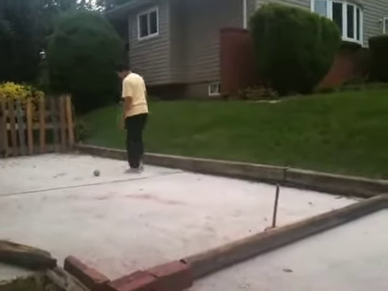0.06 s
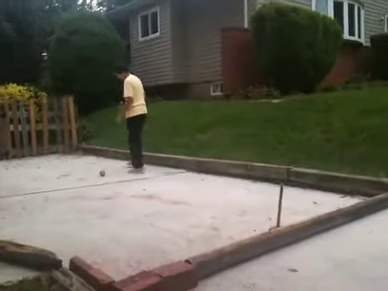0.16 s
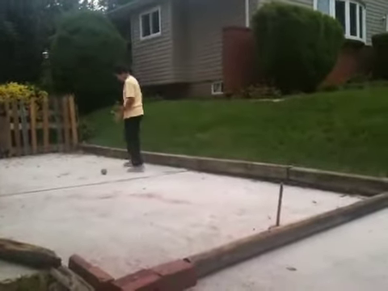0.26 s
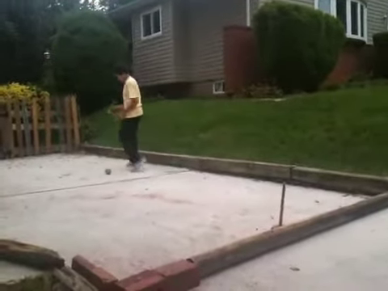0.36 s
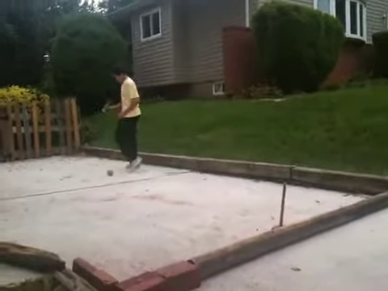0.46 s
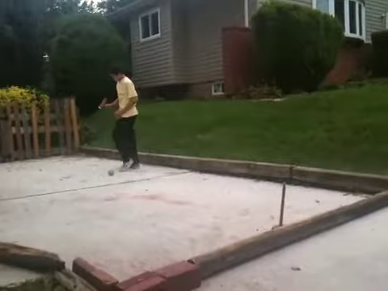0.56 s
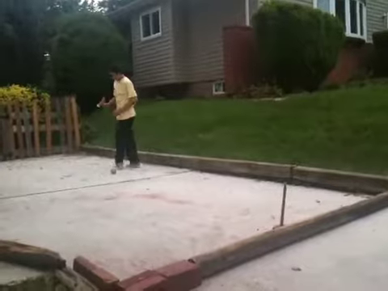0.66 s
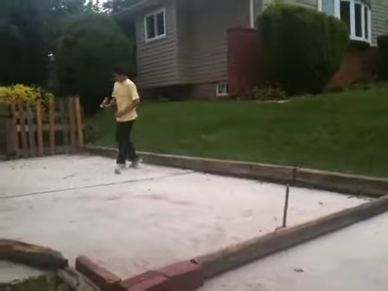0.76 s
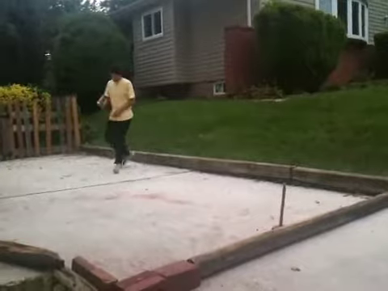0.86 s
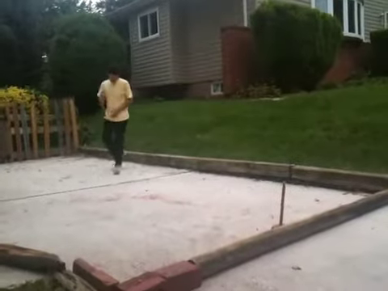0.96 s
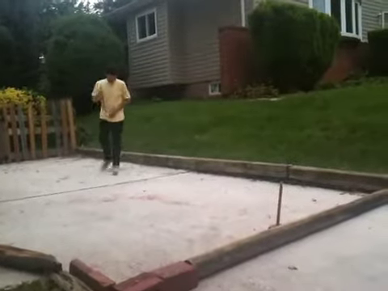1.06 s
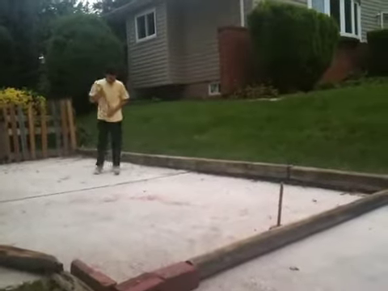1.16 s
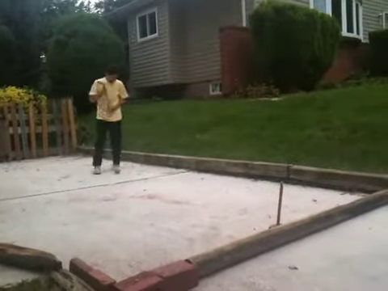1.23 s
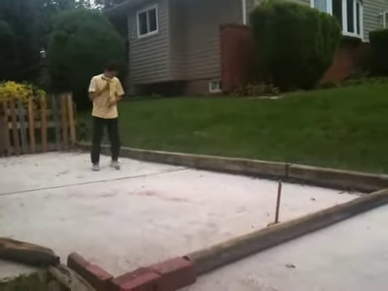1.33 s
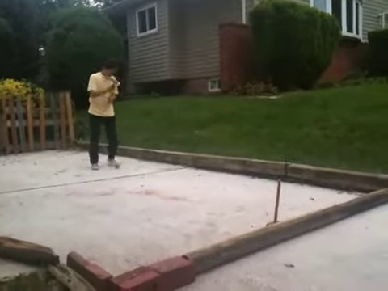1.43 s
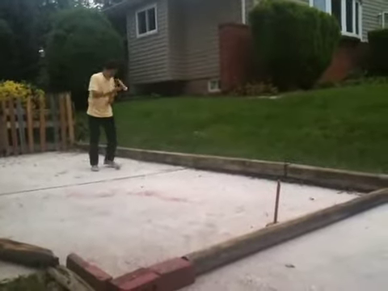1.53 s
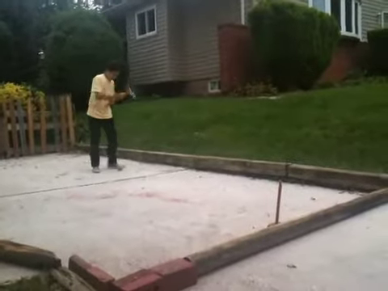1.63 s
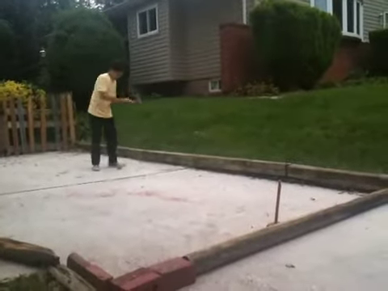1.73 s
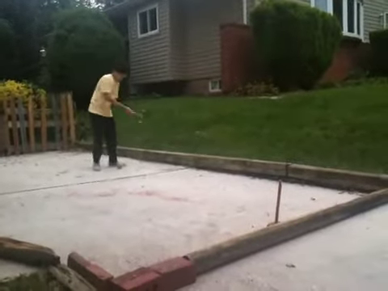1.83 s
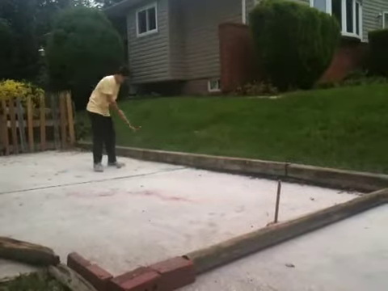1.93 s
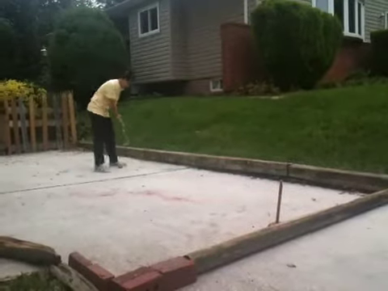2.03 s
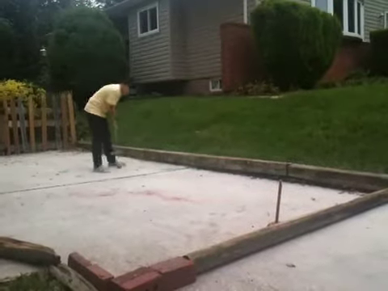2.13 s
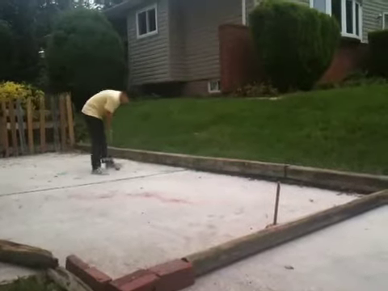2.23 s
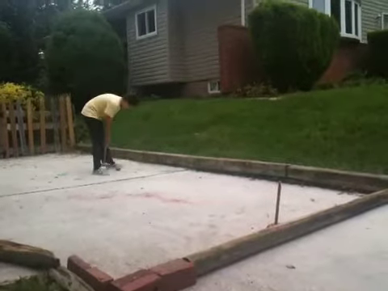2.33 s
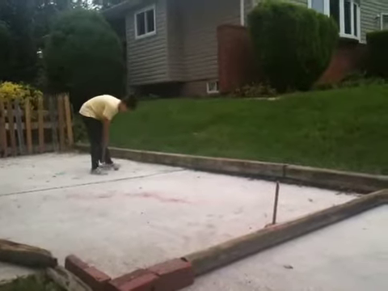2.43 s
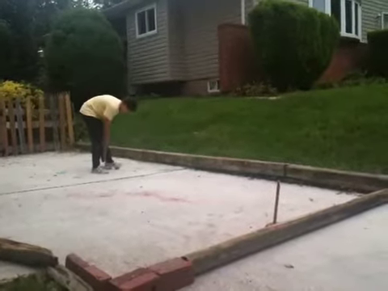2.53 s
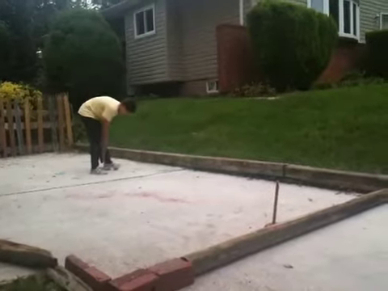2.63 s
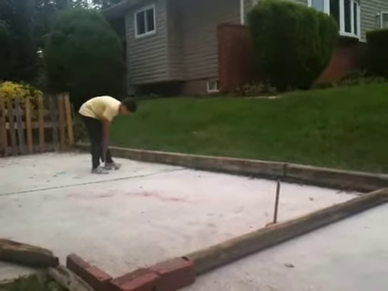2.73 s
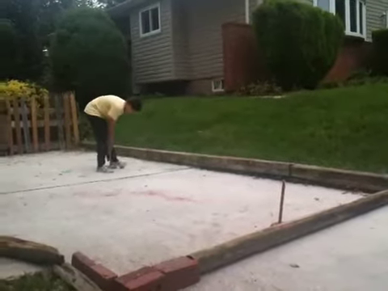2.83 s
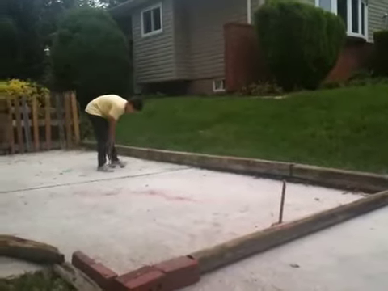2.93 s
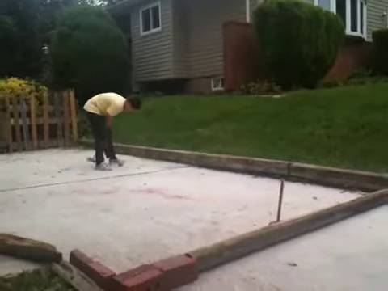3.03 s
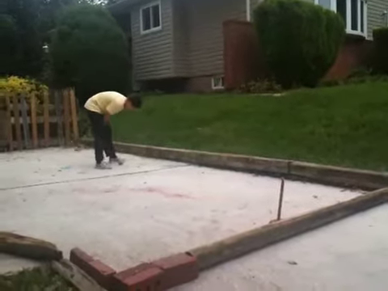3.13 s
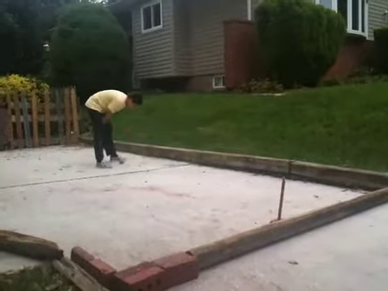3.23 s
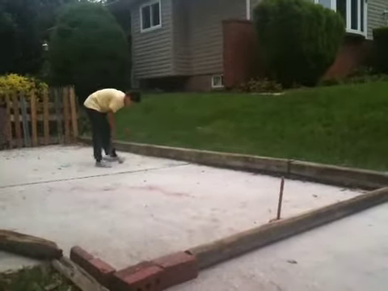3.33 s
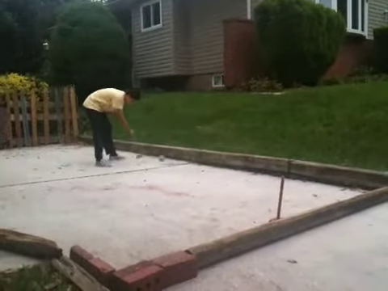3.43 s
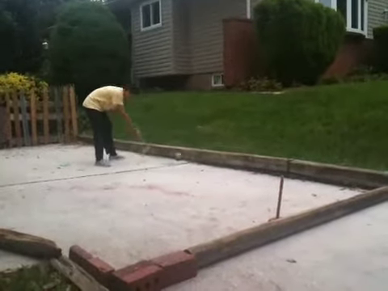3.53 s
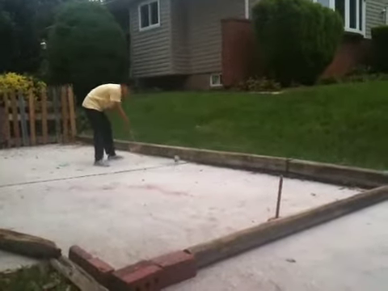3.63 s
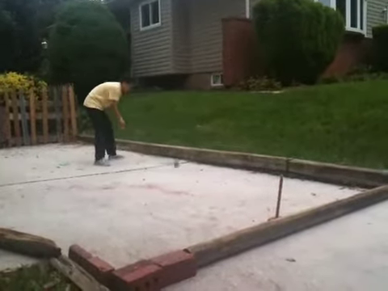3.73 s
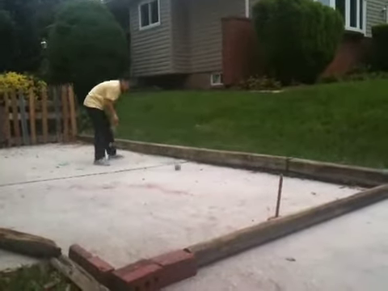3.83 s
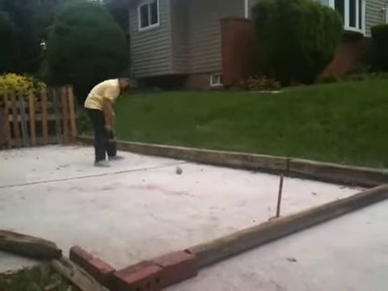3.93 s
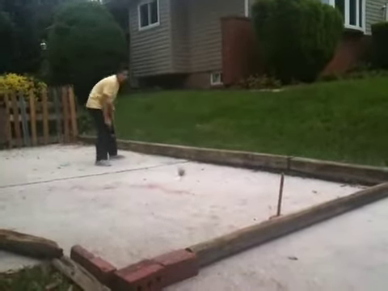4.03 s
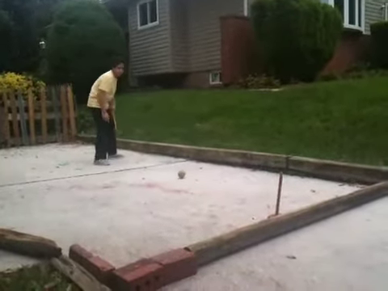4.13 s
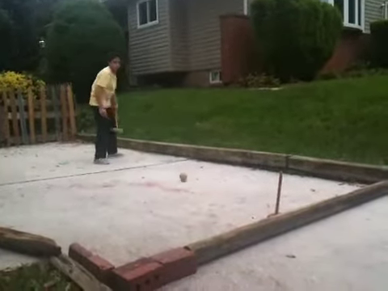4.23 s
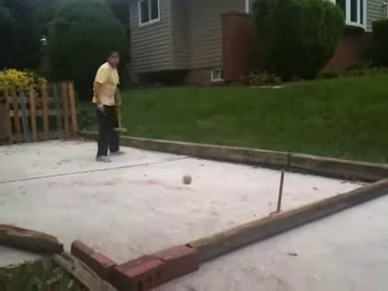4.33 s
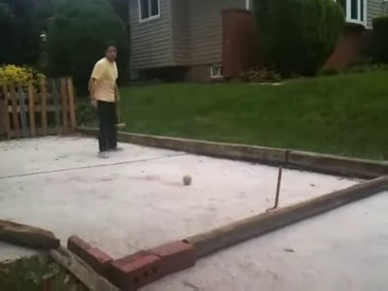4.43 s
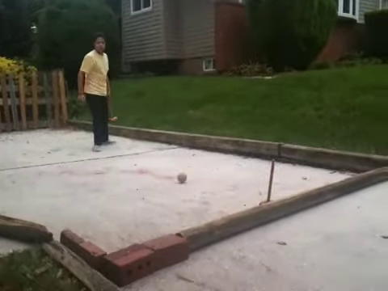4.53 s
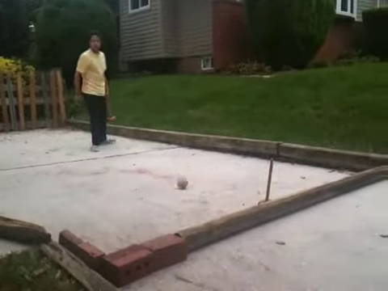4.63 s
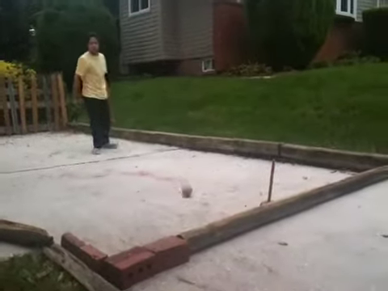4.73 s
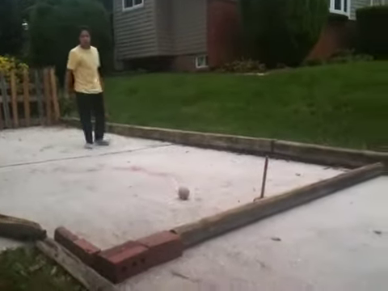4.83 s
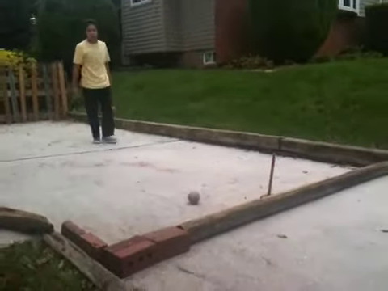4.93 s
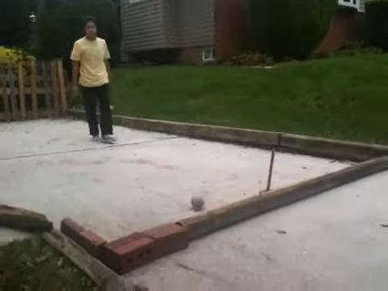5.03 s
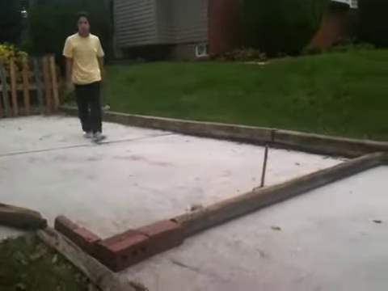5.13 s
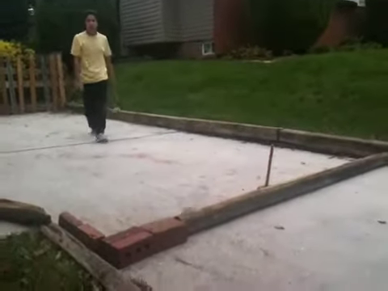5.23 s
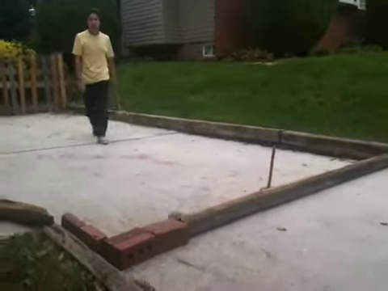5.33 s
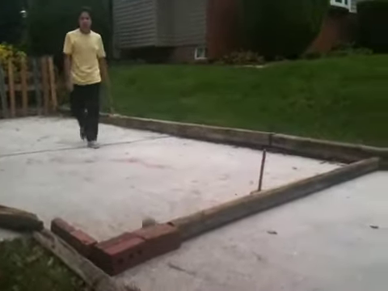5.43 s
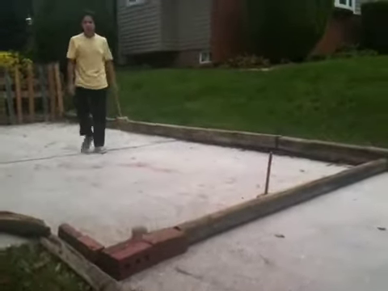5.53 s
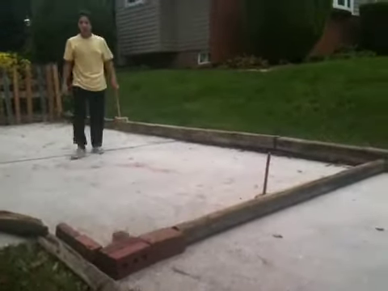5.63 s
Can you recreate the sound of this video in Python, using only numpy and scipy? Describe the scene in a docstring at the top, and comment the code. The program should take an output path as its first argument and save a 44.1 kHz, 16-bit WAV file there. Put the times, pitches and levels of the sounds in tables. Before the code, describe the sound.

Faint crickets chirp steadily in a garden, with a higher rasping insect and far traffic that sinks to a murmur over the first two seconds. From about 0.3 to 2.4 seconds, shoes scuff softly on gritty paving, with a few tiny stone clicks. At 3.4 seconds comes the loudest sound: a wooden mallet hits a hard ball with a sharp, bright crack and a very brief ring. At 3.55 the ball strikes a far border plank with a loud, hollow knock. Both echo briefly off house walls and gardens. A smaller bounce click follows at 3.75. From about 4.2 seconds the ball rolls nearer, with a faint gritty hiss, light clicks, thin ticks and more soft scuffs. At 5.25 it bumps a timber closer to the microphone with a quieter, drier wooden knock. A few faint clicks follow, and the insects continue until the end, near 5.7 seconds.

```python
"""Shoes scuff on the grit of a paved garden court, over singing crickets and far traffic that fades.
Then the loudest sound: a wooden mallet chatters against a hard ball with a bright crack. The ball
knocks a far border plank, bounces, rolls and bumps a timber nearer the microphone; both ring briefly.
House walls and gardens answer the knocks. The crickets chirp by wing strokes; a higher insect rasps."""
import sys
import numpy as np
from scipy import signal
from scipy.fft import rfft, irfft, next_fast_len
from scipy.io import wavfile
from scipy.ndimage import map_coordinates

SR = 44100
rng = np.random.default_rng(int(sys.argv[2]) if len(sys.argv) > 2 else 0)


def output_pcm(signal):
    """Save a mono or channel-first signal as 16-bit PCM at the path in sys.argv[1].

    Samples are clipped to [-1, 1] before scaling.
    """
    pcm = np.clip(np.atleast_2d(signal).T, -1, 1) * 32767
    wavfile.write(sys.argv[1], SR, np.round(pcm).astype(np.int16))


N = 249870


def ball():
    """The mallet face chatters on the ball, among other hard clicks; each is about two pressure swings."""
    # Ball on plank and paving, returns off the house wall, stones under shoes.
    # Each row: start in seconds, level in dB, pitch in Hz.
    clicks = [(.683, -40, 870), (0.803, -47, 2000), (1.328, -40, 2610), (2.063, -42, 760),
              (2.1716, -41.5, 3520), (3.4343, -9.5, 1450), (3.5547, -5, 1364), (3.5755, -14, 1530),
              (3.7594, -20.5, 1330), (3.8558, -40.5, 1280), (4.284, -43.5, 867), (4.708, -45.5, 864),
              (5.057, -51.5, 777), (5.175, -48, 601), (5.3595, -48.5, 785), (5.4035, -61, 800)]
    # Clicks turn drier as the ball rolls near. Each row: time in seconds, echo level in dB.
    echo_levels = [(3.45, -6), (3.86, -2.5), (4.3, -14.5), (4.7, -28)]
    strike_s, strike_db, strike_hz = 3.4173, -1, 1850  # the hardest contact
    gap_s, grow_db, fade_db, pitch_ratio = .00128, 4.5, 8.5, 0.93  # from one contact to the next
    chatter = []
    for k, late in zip(range(-2, 3), rng.normal(0, .12, 5)):
        db = strike_db - max(-k * grow_db, k * fade_db)
        chatter.append((strike_s + (k + late) * gap_s, db, strike_hz * pitch_ratio ** k))
    out, t = np.zeros(N), np.arange(SR // 200) / SR
    for start, db, hz in chatter + clicks:
        cycles = t * hz - .75
        swing = np.exp(-(cycles / 0.52) ** 2) * np.cos(2 * np.pi * cycles)
        echo_db = np.interp(start, *np.transpose(echo_levels))
        add(out, start, amp(db) * outdoors(swing, echo_db, gardens_db=-17))
    return band(out, 450, "high")  # a small ball radiates no bass


def cracks():
    """Bright cracks of the hard knocks, the ball's brief ring, and ringing returns off near walls."""
    # Each row: a mode of the ball in Hz, level in dB, t60 in seconds.
    modes = [(3870, -11, 0.018), (4030, -7.5, .03), (4240, -4.5, 0.035)]
    # Each row: start in seconds, level in dB, t60 in seconds, relative ring and echo levels in dB.
    cracks_and_echoes = [(3.4147, -6.5, 0.0059, -19.5, -1), (3.4324, -30.5, 0.05, 0, -5.5),
                         (3.459, -36.5, 0.016, 3.5, -8), (3.5512, -27, 0.052, -11, 4),
                         (3.7565, -51.5, .01, -23, 14)]
    out, t = np.zeros(N), np.arange(SR // 15) / SR
    ring = sum(amp(db - 60 * t / t60) * np.sin(2 * np.pi * hz * t) for hz, db, t60 in modes)
    for start, db, t60, ring_db, echo_db in cracks_and_echoes:
        burst = amp(-60 * t / t60) * rng.standard_normal(len(t))
        crack = band(burst, [3700, 8000], "band") + amp(ring_db) * ring
        add(out, start, amp(db) * outdoors(crack, echo_db, gardens_db=-12.5))
    return out


def wood(blows, modes, attack_s):
    """Blows ring the modes of a wooden border; the ring swells in, and a soft blow favours low modes."""
    out, t = np.zeros(N), np.arange(SR // 3) / SR
    swell = 1 - np.exp(-(t / attack_s) ** 2)
    for start, db, hardness, echo_db in blows:
        ring = np.zeros(len(t))
        for hz, mode_db, t60 in modes:
            struck_db = mode_db + hardness * np.log2(hz / 450) + rng.normal(0, 1)
            ring -= amp(struck_db - 60 * t / t60) * np.sin(2 * np.pi * hz * t)
        add(out, start, amp(db) * outdoors(ring * swell, echo_db, gardens_db=-3))
    return out


def far_plank():
    """The ball knocks a plank across the court: the knock, its return off far houses and a rebound."""
    # Each row: start in seconds, strength in dB, hardness in dB per octave, echo level in dB.
    blows = [(3.5516, -12, -1, -30.5), (3.711, -46.5, 4.5, -16), (3.768, -47, 1, -8.5), (3.83, -66, 9, 2)]
    # Each row: a mode of the plank in Hz, level in dB, t60 in seconds.
    modes = [(239, -5, 0.19), (346, -17, 0.012), (437.5, 5.5, 0.13), (652, -4.5, 0.12), (795, -16, 0.12),
             (925, -10, 0.12), (1146, -12, 0.054)]
    return wood(blows, modes, attack_s=.0013)


def near_timber():
    """The rolling ball bumps a timber nearer the microphone: a soft contact, then a hard one."""
    # Each row: start in seconds, strength in dB, hardness in dB per octave, echo level in dB.
    blows = [(5.2355, -34.5, -18, -20), (5.2425, -33.5, 11, -21.5)]
    # Each row: a mode of the timber in Hz, level in dB, t60 in seconds.
    modes = [(265, -6, 0.046), (352.6, -1, 0.046), (607, 5.5, 0.02), (661, 3, 0.035), (765, -4.5, 0.063),
             (1015, -13, 0.0083)]
    return wood(blows, modes, attack_s=.001)


def ticks():
    """Thin, very short treble ticks close to the microphone."""
    # Each row: start in seconds, level in dB.
    bursts = [(0.893, -47), (3.9779, -49.5), (4.5754, -29), (4.833, -49), (4.929, -50.5), (5.0036, -42),
              (5.083, -52), (5.1117, -47), (5.233, -49), (5.26, -44), (5.378, -51)]
    out, t = np.zeros(N), np.arange(300) / SR
    t60 = 0.0039
    for start, db in bursts:
        add(out, start, amp(db - 60 * t / t60) * rng.standard_normal(len(t)))
    return band(out, [8000, 13000], "band")


def scuffs():
    """Soles and the rolling ball grind grit: a coarse crunch and a fine hiss swell and fade together."""
    # Each row: loudest moment, rise and fall in seconds, crunch and hiss levels in dB.
    scrapes = [(.37, 0.056, .2, -61.5, -68), (0.639, 0.019, 0.084, -63.5, -60),
               (0.701, 0.063, 0.1, -52.5, -60.5), (.803, 0.018, 0.047, -58.5, -61),
               (1.325, .03, 0.042, -51.5, -60), (1.464, 0.089, .1, -64.5, -66),
               (1.726, 0.034, 0.083, -63, -71), (2.072, .04, 0.06, -57, -61), (2.25, 0.13, 0.23, -63, -67),
               (3.306, .06, 0.021, -69, -67.5), (4.409, 0.24, .2, -75.5, -58.5),
               (4.5, .2, 0.24, -60.5, -73), (4.576, 0.021, .05, -72.5, -59.5), (4.71, .1, .2, -101, -78),
               (4.9, .4, 0.68, -85, -75), (5.249, .04, .06, -65, -62.5), (5.462, 0.18, .12, -67, -70.5)]
    # Each row of both spectra: frequency in Hz, relative level in dB.
    crunch_spectrum = [(300, -6.5), (600, 0), (900, -2.5), (1400, -2.5), (2400, -3), (4500, -8),
                       (7000, -19), (9000, -55.5)]
    hiss_spectrum = [(3000, -39.5), (5500, -3.5), (8000, -2), (11000, -6.5), (16000, -19)]
    t = np.arange(N) / SR
    crunch, hiss = np.zeros((2, N))
    for peak_s, rise, fall, crunch_db, hiss_db in scrapes:
        swell_db = -20 * np.maximum((peak_s - t) / rise, (t - peak_s) / fall)
        crunch += amp(crunch_db + swell_db)
        hiss += amp(hiss_db + swell_db)
    return crunch * noise(crunch_spectrum, grit_db=5) + hiss * noise(hiss_spectrum, grit_db=2.5)


def crickets():
    """Wing strokes ring one narrow resonance; a chirp is a strong stroke group, then weaker ones."""
    # Each row: pitch in Hz, chirps a second, first chirp and chirp length in seconds, level in dB.
    singers = [(5385, 8.2, .076, .07, -64.5), (5180, 8.53, .03, .045, -70), (4750, 8.73, .0, .05, -71)]
    out, t = np.zeros(N), np.arange(N) / SR
    for hz, rate, first, length, db in singers:
        progress = ((t - first) * rate % 1) / (rate * length)  # 0-1 within the chirp
        chirp = np.sin(np.pi * np.clip(progress, 0, 1)) ** .4 * np.exp(-.9 * progress)
        stroke_groups = 1 - .4 * np.cos(2 * np.pi * 2.5 * progress)
        pitch = hz * (1 + .007 * wobble(200))
        flutter_db = .9 * wobble(9) + 3.5 * wobble(200)
        out += amp(db + flutter_db) * chirp * stroke_groups * np.sin(2 * np.pi * np.cumsum(pitch) / SR)
    return out


def rasping_insect():
    """A higher insect rasps faintly in short swells of narrow, grainy noise."""
    # Each entry: the middle of a rasp in seconds.
    rasp_times = [.26, .59, .94, 1.39, 1.8, 2.15, 2.52, 2.96, 3.28, 3.939, 4.243, 4.629, 4.93, 5.599]
    # Each row: frequency in Hz, relative level in dB.
    spectrum = [(6100, -42.5), (6550, -4), (6800, 2), (7050, 0), (7500, -46.5)]
    t = np.arange(N) / SR
    level_db, half_width_s = -76.5, 0.056
    swells = sum(np.exp(-((t - peak_s) / half_width_s) ** 2) for peak_s in rasp_times)
    return amp(level_db) * swells * noise(spectrum, grit_db=3)


def traffic():
    """Far traffic: rumble and tyre roar waver and sink to a murmur."""
    # Each row: time in seconds, rumble and tyre roar levels in dB.
    levels = [(0, -57.5, -57.5), (.5, -59, -61.5), (2, -64, -66), (3.2, -65.5, -68.5), (4.05, -63.5, -66),
              (4.5, -62.5, -68.5), (5.67, -63.5, -68.5)]
    # Each row of both spectra: frequency in Hz, relative level in dB.
    rumble_spectrum = [(24, -23), (40, -24), (90, -8), (170, -2.5), (260, -6.5), (330, -15), (500, -46)]
    roar_spectrum = [(200, -26), (350, -6), (620, -8), (950, -4), (1500, -10), (2800, -19.5), (5000, -32.5)]
    rumble_db, roar_db = curves(levels)
    rumble = amp(rumble_db + 1.5 * wobble(6.7)) * noise(rumble_spectrum)
    roar = amp(roar_db + 0.51 * wobble(27)) * noise(roar_spectrum)
    return rumble + roar


def insect_chorus():
    """A far insect chorus over the microphone's own hiss, shimmering as one bed of noise."""
    # Each row: frequency in Hz, relative level in dB.
    spectrum = [(1500, -35.5), (3300, -15.5), (4300, -3.5), (5000, -2), (5500, -6), (6100, -12.5),
                (9000, -13.5), (13500, -22), (15200, -14.5), (16000, -16)]
    return amp(-70 + 1.7 * wobble(4.4)) * noise(spectrum)


def outdoors(sound, echo_db, gardens_db):
    """The sound, its scatter off near walls, and a longer one off the gardens, gardens_db against it."""
    # Each row of both decays: frequency in Hz, t60 in seconds.
    wall_decay = [(300, 0.36), (1500, 0.059), (4000, 0.13), (6000, 0.013), (15000, 0.24)]
    garden_decay = [(300, 1), (1500, 0.67), (3000, 0.88), (8000, 0.1), (15000, 0.17)]
    answer = tail(wall_decay) + amp(gardens_db) * tail(garden_decay)
    delayed = np.pad(sound, (120, 0))
    out = amp(echo_db) * signal.fftconvolve(delayed, answer)
    add(out, 0, sound)
    return out


def tail(t60s):
    """A fresh noise tail of energy 1 in which each frequency dies at its own speed."""
    hz, t, bins = signal.stft(rng.standard_normal(SR), SR, nperseg=128)
    decay = amp(-60 * t / along(t60s, hz)[:, None])
    out = signal.istft(bins * decay, SR, nperseg=128)[1]
    return out / np.linalg.norm(out)


def noise(spectrum, grit_db=0):
    """Coloured noise of rms 1; grit_db spreads the sizes of its grains, a few of them large."""
    grains = rng.standard_normal(N) * amp(grit_db * np.abs(wobble(350)))
    coloured = filtered(grains, lambda hz: amp(along(spectrum, hz)))
    return coloured / np.sqrt(np.mean(coloured ** 2) + 1e-20)


def wobble(rate):
    """A smooth random curve, rate knots a second."""
    knots = rng.standard_normal(int(N * rate / SR) + 4)
    return map_coordinates(knots, [np.arange(N) * rate / SR])


def amp(db):
    """Decibels as amplitude."""
    return 10 ** (np.asarray(db) / 20)


def along(points, hz):
    """Interpolates (Hz, value) points on a log frequency axis."""
    point_hz, values = np.transpose(points)
    return np.interp(np.log(hz + 1), np.log(point_hz + 1), values)


def curves(rows):
    """One value per sample for each column after the time."""
    times, *columns = np.transpose(rows)
    return [np.interp(np.arange(N) / SR, times, column) for column in columns]


def band(x, hz, kind):
    """x through a gentle filter with its edge or edges at hz."""
    return signal.sosfilt(signal.butter(2, hz, kind, fs=SR, output="sos"), x)


def filtered(x, response):
    """x shaped by a gain that depends on frequency."""
    size = next_fast_len(N + SR // 2)
    gain = response(np.fft.rfftfreq(size, 1 / SR))
    return irfft(rfft(x, size) * gain, size)[..., :N]


def add(track, start, sound):
    """Mixes a sound into the track from start, in seconds."""
    part = track[round(start * SR):][:len(sound)]
    part += sound[:len(part)]


def scene():
    """The court and the gardens around it, heard from one spot in mono."""
    play = far_plank() + near_timber() + ball() + cracks() + ticks() + scuffs()
    return (play + crickets() + rasping_insect() + traffic() + insect_chorus())[None]


def record(dry):
    """The small microphone drops the bass, and nothing passes above the band limit."""
    bass_hz, top_hz = 170, 15950
    thin = band(dry, bass_hz, "high")
    return filtered(thin, lambda hz: np.clip((top_hz - hz) / 300, 0, 1))


dry = scene()
out = record(dry)
output_pcm(out)
```